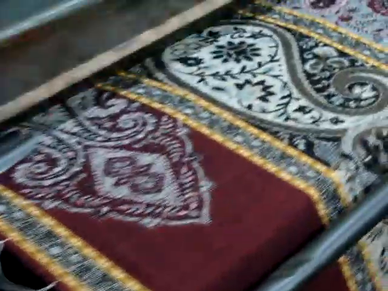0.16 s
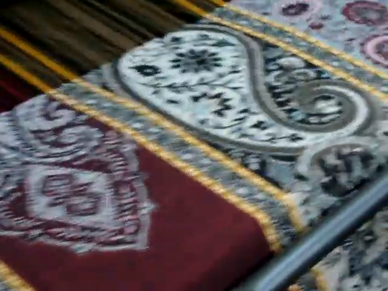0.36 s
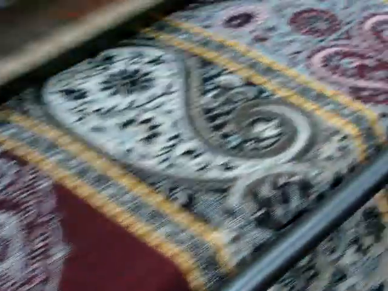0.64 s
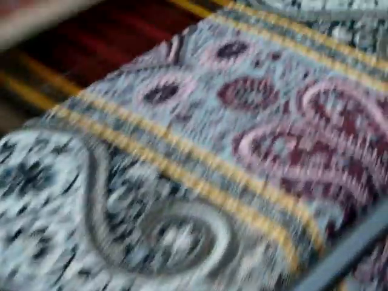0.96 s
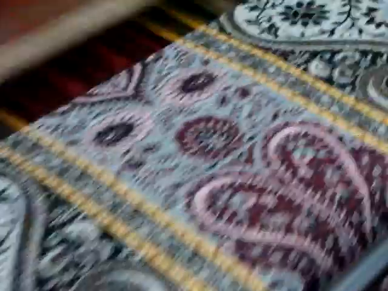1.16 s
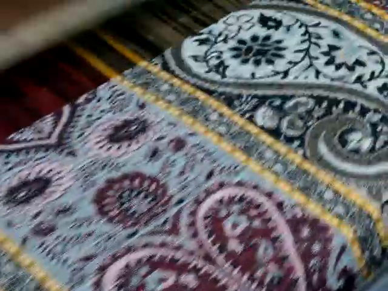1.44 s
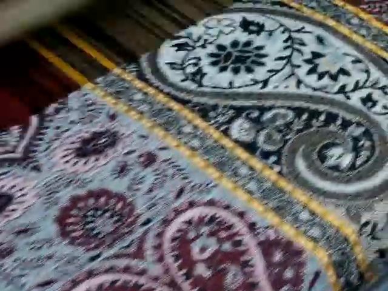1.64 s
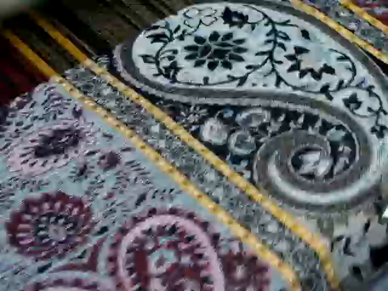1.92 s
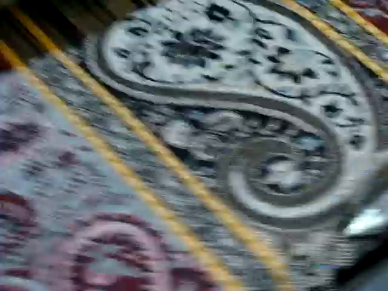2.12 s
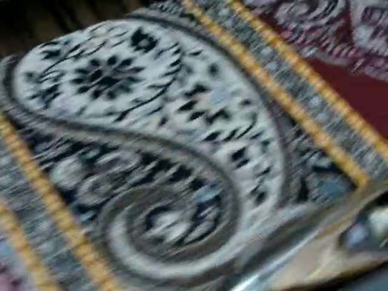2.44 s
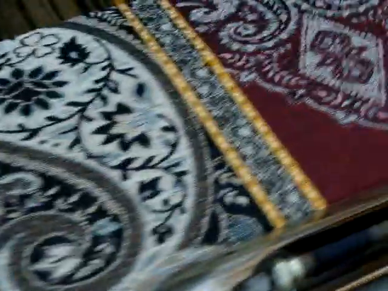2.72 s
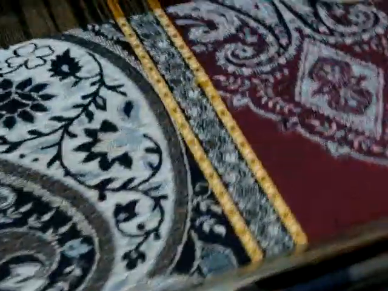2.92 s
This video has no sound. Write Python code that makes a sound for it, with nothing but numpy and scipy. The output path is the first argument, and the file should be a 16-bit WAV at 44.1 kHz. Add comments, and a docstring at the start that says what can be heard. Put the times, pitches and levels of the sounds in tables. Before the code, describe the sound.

A power loom clatters rapidly up close, with sharp knocks over a steady workshop din.

```python
"""Power loom in a workshop

Heard close up in mono in a hard-walled weaving workshop: over four times a second heddles and linkages
surge into a dense metallic rattle, made of random contacts and a noise wash in 33 bands.
Picker and shuttle knock sharply and wood clacks: short noise bursts with a room tail. The batten's beat
thumps the frame (decaying sines); other looms keep up a steady din (banded, flickering noise).
"""
import sys
import numpy as np
from scipy import signal
from scipy.io import wavfile
from scipy.ndimage import uniform_filter1d

SR = 44100
rng = np.random.default_rng(int(sys.argv[2]) if len(sys.argv) > 2 else 0)


def inscribe(sig):
    """Save sig as 16-bit PCM at rate SR to the path in sys.argv[1].

    A 1-D sig is mono; a 2-D sig holds one channel per row.
    Samples are clipped to [-1, 1] before scaling.
    """
    pcm = np.round(np.clip(np.atleast_2d(sig).T, -1, 1) * 32767)
    wavfile.write(sys.argv[1], SR, pcm.astype(np.int16))


N = 135828
T = np.arange(N) / SR

# Din spectrum, relative: hz, density_db_per_hz
DIN_SPECTRUM = [(25, -15), (55, -26.5), (85, -19), (130, -13), (190, -7.5), (265, -2.5), (350, -4),
                (650, 1.5), (1000, 3.5), (1650, 1), (2200, 2), (3200, 2), (5000, -1), (7000, -4.5),
                (10000, -24.5)]
# Din level over time, relative to DIN_DB: time_s, level_db
DIN_LEVEL = [(0, -1), (.18, 0.7), (.26, -2.2), (.42, 1.2), (.95, 0), (1.19, -2.5), (1.4, 0.1), (1.65, 1.5),
             (2.12, -1.5), (2.4, .5), (2.95, .5), (3.08, -5)]
# Frame thumps: start_s, level_db (added to the mode level)
THUMPS = [(.337, -50), (.408, -38), (0.613, -47), (0.809, -47), (1.001, -52), (1.06, -48), (1.363, -43),
          (1.566, -52), (1.762, -49), (1.932, -41), (2.315, -32), (2.885, -39), (2.97, -43)]
# Frame modes: pitch_hz, relative_level_db, t60_s
FRAME_MODES = [(26, -7, .08), (60, -1, .04), (115, -3, .03), (180, 4, .03)]
# Sharp knocks: start_s, level_db (before KNOCK_DB), tilt_db_per_octave, amplitude_decay_s (time constant)
KNOCKS = [(.0595, -14, 0, 0.0051), (.079, -9, 0, .003), (0.0964, -13, -4, 0.0024),
          (0.336, -11, -7.5, 0.0035), (.4076, -3.5, 3, 0.0013), (.579, -10, 1, .002),
          (.6135, -9, 2, 0.0046), (.7415, -10, 2.5, 0.0054), (.808, -9, 0, .003), (.859, -13, 5, 0.0024),
          (1.002, -9.5, -2.5, 0.0043), (1.009, -9, 5, .002), (1.0515, -15.5, -4, .003),
          (1.0594, -5, 0, 0.0035), (1.3615, -7.5, 3, 0.0068), (1.5675, -11.5, -5.5, 0.0071),
          (1.692, -12, 15, .004), (1.761, -11, 0, 0.0026), (1.9042, -16, .5, 0.0045),
          (1.9319, -4, -2, 0.0017), (1.9548, -6.5, 1, .003), (2.001, -11.5, -1, .005),
          (2.021, -20, -9, 0.0014), (2.3065, -7, 6, 0.0018), (2.3147, -4.5, 0.5, 0.0047),
          (2.5146, -12, -1, 0.0059), (2.615, -12, -2, .004), (2.869, -17, -5, .003), (2.884, -4, 1, 0.0024),
          (2.957, -15.5, -6, .003), (2.966, -6.5, 3, 0.0063)]
# Knock spectrum, relative: hz, density_db_per_hz
KNOCK_SPECTRUM = [(100, -22.5), (500, -10), (1000, -7), (1800, 9), (3500, 4.5), (6000, 10.5), (8000, -9),
                  (10000, -21.5)]
# Dull clacks of wooden parts: start_s, level_db
CLACKS = [(.404, -18), (.643, -27), (0.786, -21), (1.054, -23), (1.271, -16), (1.362, -14), (1.828, -13),
          (2.207, -17), (2.244, -16.5), (2.303, -21), (2.857, -20)]
# Wood spectrum, relative: hz, density_db_per_hz
WOOD_SPECTRUM = [(120, -25.5), (450, -15), (750, -7), (1300, 3.5), (2000, 0), (4000, -18), (10000, -25)]
# Rattle surges: start_s, rise_s, hold_s, release_s (time constant), relative_level_db, tilt_db_per_octave
SURGES = [(0.056, 0.025, .025, 0.052, -19.5, 1.8), (0.287, 0.049, 0.072, 0.054, -20, -1.4),
          (0.491, 0.048, 0.07, .05, -18, 0.3), (0.728, 0.071, .065, 0.076, -17.5, -0.2),
          (1.002, 0.0056, 0.063, 0.033, -22, -0.5), (1.223, 0.053, 0.066, 0.062, -22, -1.5),
          (1.415, 0.098, 0.071, 0.11, -18.5, 0), (1.685, 0.013, 0.15, 0.13, -18, -1.5),
          (1.967, 0.03, .02, 0.022, -16.5, 0), (2.191, 0.01, 0.13, 0.0065, -20, -2.3),
          (2.369, .125, 0.037, 0.073, -18, -1.6), (2.612, .004, 0.011, 0.061, -21, .6),
          (2.63, 0.047, 0.12, 0.069, -17, -1.7), (2.854, .006, 0.038, 0.047, -21, 0),
          (2.947, 0.017, 0.013, 0.0084, -12.5, 0.9)]
# Rattle spectrum, relative: hz, density_db_per_hz
RATTLE_SPECTRUM = [(100, -35.5), (250, -14), (450, -11), (680, -4.5), (950, -8.5), (1300, -2), (1750, 1),
                   (2100, -3.5), (2750, 1.5), (3600, 1), (4500, 0), (6300, -2), (8000, -4.5),
                   (10000, -23.5)]
# Groups of parts, large to small, clashing independently: centre_hz
GROUP_HZ = np.array([900, 2600, 5000, 8500])

EDGES_HZ = np.geomspace(20, 11500, 34)
CENTRES_HZ = np.sqrt(EDGES_HZ[1:] * EDGES_HZ[:-1])
TILT_PIVOT_HZ = 2800

DIN_DB, DIN_FLICKER_DB, DIN_FLICKER_HZ = -23, 1.48, 30.15
KNOCK_DB, CLACK_DECAY_S = -1.5, 0.0066
ROOM_TAIL_DB, ROOM_T60_S = -23, 0.53   # tail start relative to the blow
RATTLE_DIRECT_DB, RATTLE_WASH_DB = -3.5, -3
RATTLE_IDLE_DB = -26   # left between surges
CONTACTS_PER_S, CONTACT_SPREAD_DB = 1200, 3
CONTACT_TILT_DB_PER_OCTAVE = 2   # largest tilt either way
CLASHES_PER_S, CLASH_POWER_DECAY_S, CLASH_DEPTH = 100, 0.0058, 1.6
LIMIT_DB, LIMIT_RELEASE_DB_PER_S, LIMIT_RANGE_DB = -11.5, 87, 5.5
ROUNDING_PEAK, CUTOFF_HZ = .7, 10083


def from_db(db):
    """Decibels to amplitude gain."""
    return 10 ** (np.asarray(db) / 20)


def rms_one(x):
    """Scale to unit rms."""
    return x / np.sqrt(np.mean(x ** 2) + 1e-20)


def drift(rate_hz):
    """Random knots joined by lines, unit rms."""
    knots = rng.standard_normal(1000)
    return rms_one(np.interp(T * rate_hz, np.arange(len(knots)), knots))


def octaves(hz):
    """Distance from the tilt pivot, at most two octaves."""
    return np.clip(np.log2(hz / TILT_PIVOT_HZ), -2, 2)


def band(x, k, count=1):
    """Band-pass over count bands from the k-th; scaled so that white noise keeps its rms."""
    low, high = EDGES_HZ[k], EDGES_HZ[k + count]
    sos = signal.butter(2, [low, high], "band", fs=SR, output="sos")
    return signal.sosfilt(sos, x + 1e-18) * np.sqrt(SR / 2 / (high - low))


def band_gains(spectrum, tilt=0):
    """Gain of each band for a density spectrum tilted about the pivot; total power 1."""
    hz, db = np.transpose(spectrum)
    density_db = np.interp(np.log(CENTRES_HZ), np.log(hz), db) + tilt * octaves(CENTRES_HZ)
    gain = from_db(density_db) * np.sqrt(np.diff(EDGES_HZ))
    return gain / np.linalg.norm(gain)


def din():
    """Other looms blurred by the room: noise bands that flicker independently."""
    roar = np.zeros(N)
    for k, gain in enumerate(band_gains(DIN_SPECTRUM)):
        flicker = from_db(DIN_FLICKER_DB * drift(DIN_FLICKER_HZ))
        roar += gain * band(rng.standard_normal(N), k) * flicker
    return roar * from_db(DIN_DB + np.interp(T, *np.transpose(DIN_LEVEL)))


def thumps():
    """Heavy blows push the frame; its low modes die at once."""
    out = np.zeros(N)
    for start_s, db in THUMPS:
        start = int(start_s * SR)
        age = T[:min(N - start, SR // 4)]
        for hz, mode_db, t60_s in FRAME_MODES:
            envelope = from_db(db + mode_db - 60 * age / t60_s)
            out[start:start + len(age)] += envelope * np.sin(2 * np.pi * hz * age)
    return out


def blows(rows, spectrum, count=3):
    """Hard blows: a crack of a few milliseconds in wide bands, then the room's tail."""
    power = np.zeros((len(CENTRES_HZ), N))
    for start_s, db, tilt, decay_s in rows:
        start = int(start_s * SR)
        age = T[:min(N - start, SR // 3)]
        crack = np.exp(-2 * age / decay_s)
        tail = from_db(ROOM_TAIL_DB - 60 * age / ROOM_T60_S) ** 2
        band_power = (from_db(db) * band_gains(spectrum, tilt)) ** 2
        power[:, start:start + len(age)] += np.outer(band_power, crack + tail)
    out = np.zeros(N)
    for k in range(0, len(CENTRES_HZ), count):
        envelope = np.sqrt(power[k:k + count].sum(axis=0))
        out += band(envelope * rng.choice([-1, 1], N), k, count)
    return out


def knocks():
    """Bright knocks of picker and shuttle."""
    return from_db(KNOCK_DB) * blows(KNOCKS, KNOCK_SPECTRUM)


def clacks():
    """Duller clacks of wooden parts, all with one decay and no tilt."""
    rows = [(start_s, db, 0, CLACK_DECAY_S) for start_s, db in CLACKS]
    return blows(rows, WOOD_SPECTRUM)


def clashes():
    """Parts meeting in bunches: power jumps at each clash and decays; mean power 1."""
    hits = (rng.random(N) < CLASHES_PER_S / SR) * rng.uniform(.5, 1, N)
    power = signal.lfilter([1], [1, -np.exp(-1 / (CLASH_POWER_DECAY_S * SR))], hits)
    return rms_one(np.sqrt(1 + CLASH_DEPTH * power / power.mean()))


def surge_levels():
    """Amplitude of every band over time: powers of the surges plus the idle rattle."""
    swells, colours = [], []
    for start_s, rise_s, hold_s, release_s, db, tilt in SURGES:
        rise = np.clip((T - start_s) / rise_s, 0, 1)
        release = np.exp(-np.maximum(T - start_s - rise_s - hold_s, 0) / release_s)
        swells.append(rise * release)
        colours.append(from_db(db) * band_gains(RATTLE_SPECTRUM, tilt))
    idle = from_db(RATTLE_IDLE_DB) * band_gains(RATTLE_SPECTRUM)
    return np.sqrt(np.array(colours).T ** 2 @ np.array(swells) ** 2 + idle[:, None] ** 2)


def rattle():
    """Small contacts ring the metal parts (bands) briefly; the room smears them into a noise wash."""
    strength_db = CONTACT_SPREAD_DB * np.minimum(rng.exponential(1, N), 2)
    contacts = (rng.random(N) < CONTACTS_PER_S / SR) * from_db(strength_db)
    tilts = CONTACT_TILT_DB_PER_OCTAVE * rng.uniform(-1, 1, N)
    groups = [clashes() for _ in GROUP_HZ]
    out = np.zeros(N)
    for k, level in enumerate(surge_levels()):
        centre_hz = CENTRES_HZ[k]
        nearest = np.argmin(np.abs(np.log(GROUP_HZ / centre_hz)))
        pulses = contacts * from_db(tilts * octaves(centre_hz)) * rng.uniform(-1.3, 1, N)
        direct = from_db(RATTLE_DIRECT_DB) * rms_one(pulses)
        wash = from_db(RATTLE_WASH_DB) * rng.standard_normal(N)
        out += band((direct + wash) * level * groups[nearest], k)
    return out


def scene():
    """Workshop and loom, the same in both channels."""
    mono = din() + thumps() + clacks() + knocks() + rattle()
    return np.tile(mono, (2, 1))


def record(dry):
    """Limiter ducks loud moments and recovers at a steady dB rate; peaks rounded, top cut steeply."""
    window = 88   # samples, 2 ms
    level_db = 10 * np.log10(np.abs(uniform_filter1d(dry[0] ** 2, size=window)) + 1e-12)
    excess_db = np.clip(level_db - LIMIT_DB, 0, LIMIT_RANGE_DB)
    # running maximum on a rising ramp = instant attack, linear release
    ramp_db = LIMIT_RELEASE_DB_PER_S * T
    held_db = np.maximum.accumulate(excess_db + ramp_db) - ramp_db
    ducked = dry * from_db(-uniform_filter1d(held_db, size=window))
    rounded = ducked / (1 + (ducked / ROUNDING_PEAK) ** 6) ** (1 / 6)
    low_pass = signal.ellip(14, .1, 80, CUTOFF_HZ, fs=SR, output="sos")
    return signal.sosfilt(low_pass, rounded)


dry = scene()
out = record(dry)
inscribe(out)
```